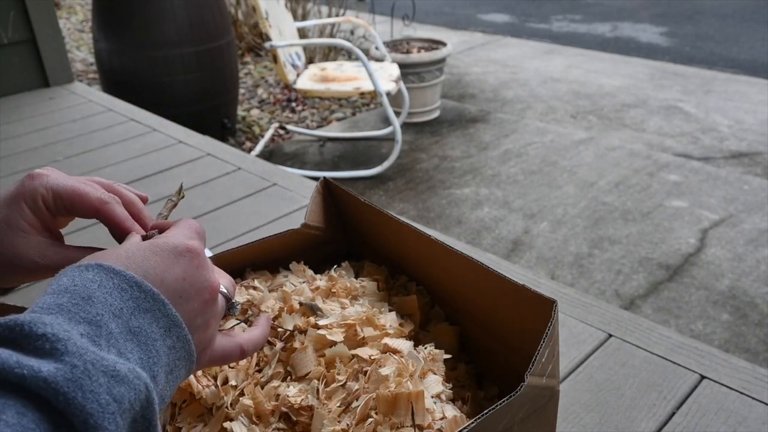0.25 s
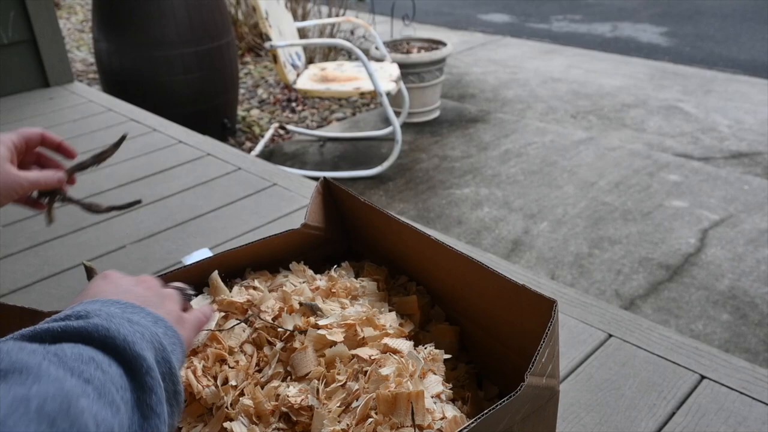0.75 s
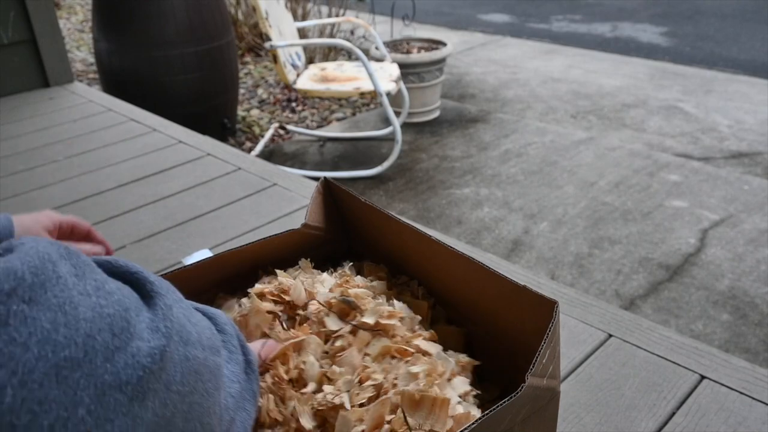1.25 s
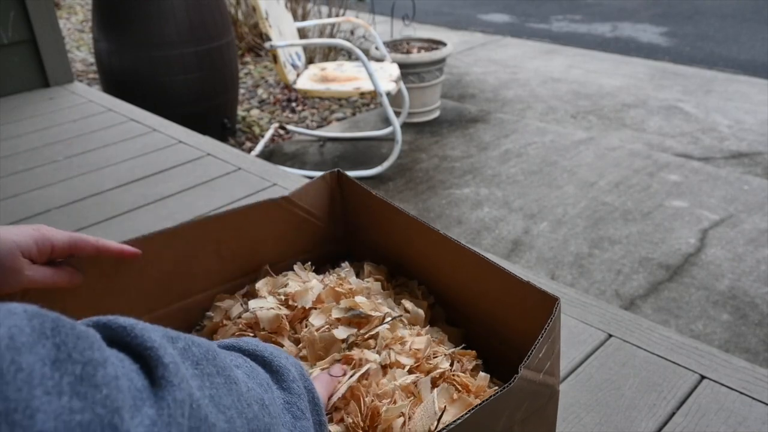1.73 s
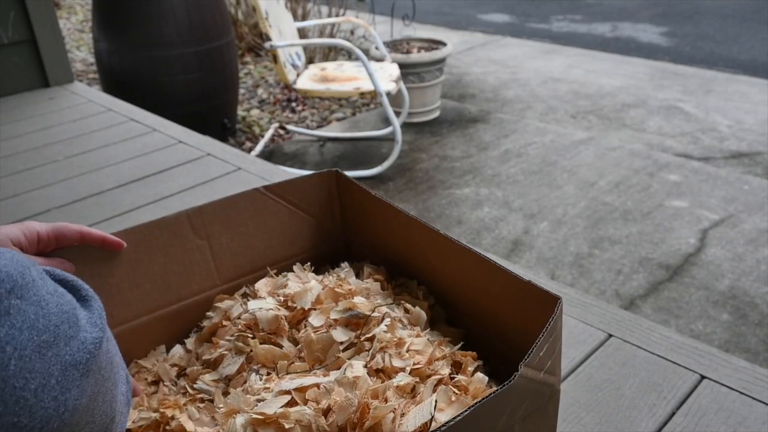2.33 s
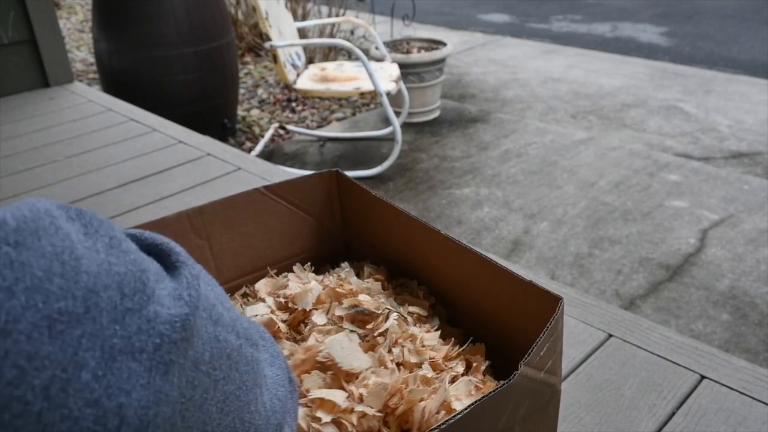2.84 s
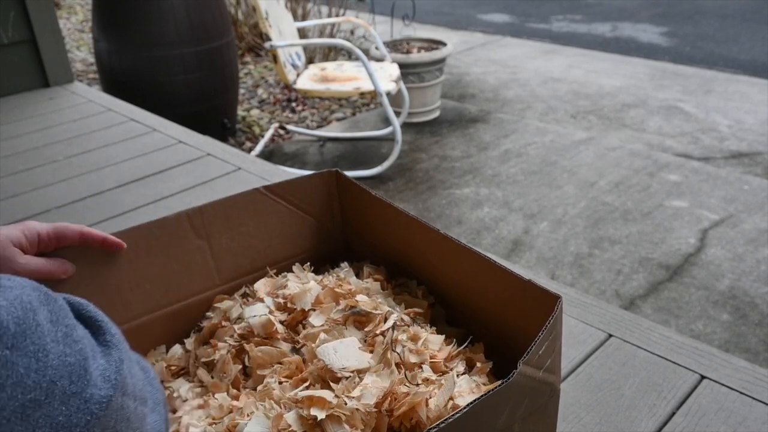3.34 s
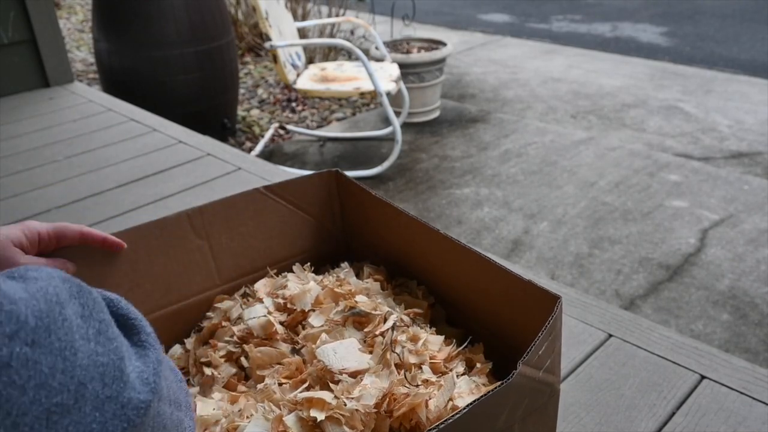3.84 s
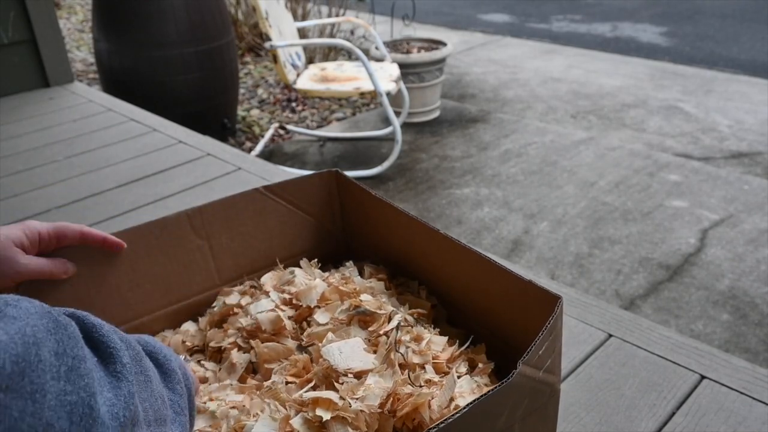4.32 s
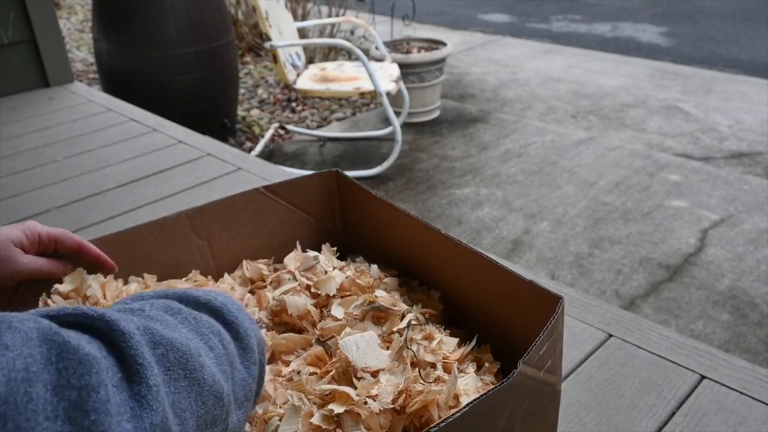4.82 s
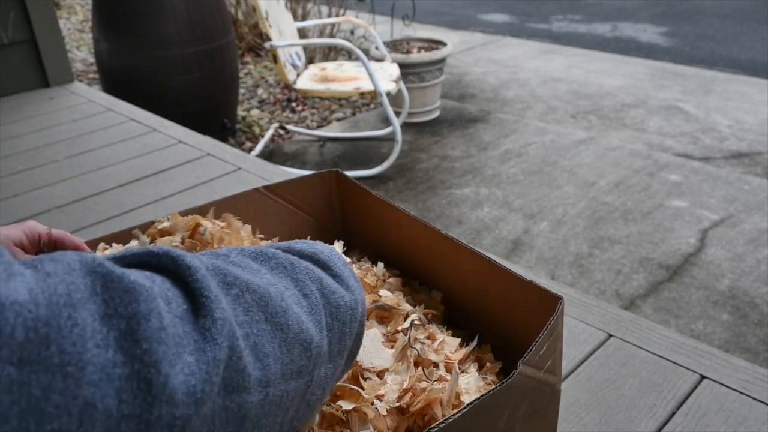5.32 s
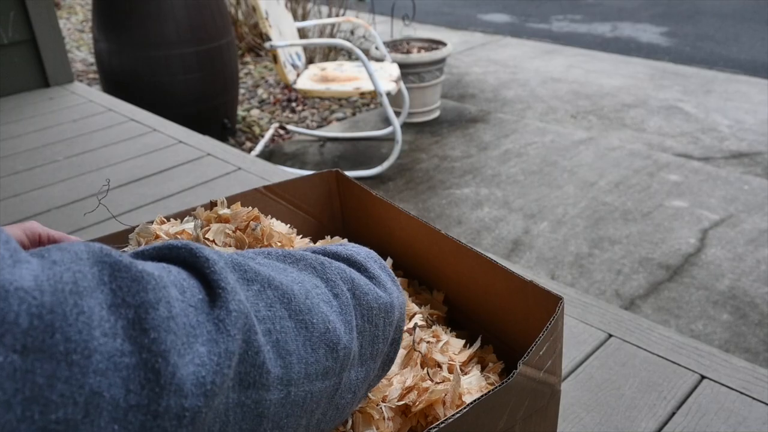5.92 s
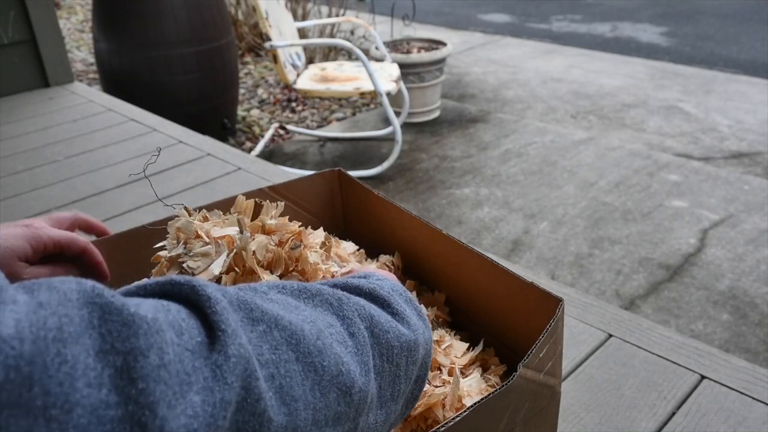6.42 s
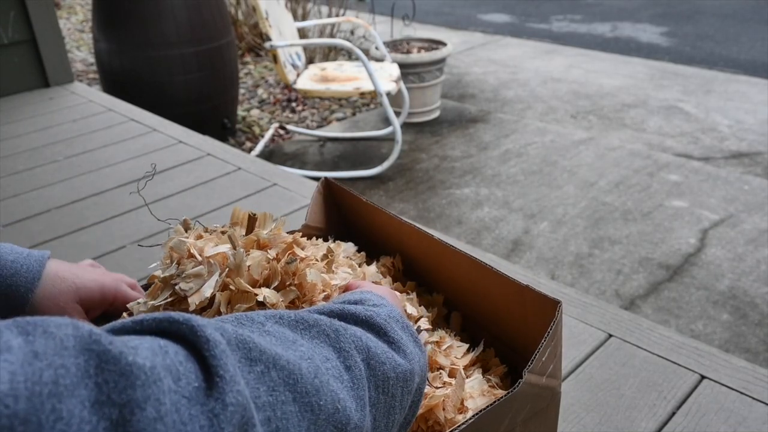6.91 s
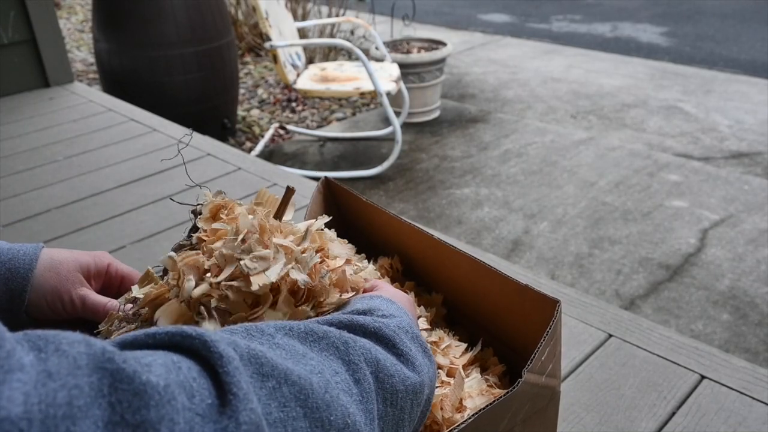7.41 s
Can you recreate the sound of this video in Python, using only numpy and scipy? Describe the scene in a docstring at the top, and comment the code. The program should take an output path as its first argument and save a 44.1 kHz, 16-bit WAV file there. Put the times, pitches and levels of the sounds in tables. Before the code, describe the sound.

Close, dry and centred on a porch, with a soft steady wash of outdoor air. From 0 to 1 s a bird repeats quick falling chirps, about nine a second, with a slight yard echo; dry bark ticks, with a bright snap near the start, and a sleeve hisses faintly around 0.6 s. At 1.2 s hands plunge into wood shavings: a dense crisp rustle and a tumble of hollow cardboard knocks until 1.45 s. Sharp snaps come at 1.55 and 1.9 s, a firm crunch with a knock at 2.2, and a very bright double crack at 2.6. Rustling strokes continue, softer around 3.7-4 s, with strong cracks at 5.0 s. Faint bird whistles come at times. Gentler rummaging follows; at 6.55-7.0 s cardboard scrapes in jerky slips with a small squeak, strongest at the end. Chirps return from 7.1 s over light rustling and ticks.

```python
"""On a quiet porch a bird opens with a run of falling tonal chirps while dry bark ticks and a sleeve hisses.
Hands then stroke through shavings in a cardboard box: dense random slips, filtered as flakes, heap and bottom.
Blows dent the box and ring its wall modes, and splinters snap as short bursts through resonances.
Late on, the panel is scraped by swelling, quickly dying slips; then a shorter run of chirps returns.
Yard and porch echoes are decaying noise tails, and steady coloured noise is the outdoor air."""
import sys
import numpy as np
from scipy import signal
from scipy.fft import rfft, irfft
from scipy.io import wavfile

SR = 44100
rng = np.random.default_rng(int(sys.argv[2]) if len(sys.argv) > 2 else 0)


def materialize(psi):
    """Save the field psi as 16-bit PCM at rate SR to the path in sys.argv[1].

    A 1-D psi becomes a single channel; in a 2-D psi each row is a channel.
    """
    bounded = np.clip(np.atleast_2d(psi).T, -1, 1)
    quanta = np.round(bounded * 32767).astype(np.int16)
    wavfile.write(sys.argv[1], SR, quanta)


N = 337806
TIME, HZ = np.arange(N) / SR, np.fft.rfftfreq(N, 1 / SR)

# relative spectrum of rubbing flakes: f/Hz, density level/dB
FLAKE_SPECTRUM = [(40, -41), (110, -45), (330, -9), (750, -0.5), (2400, 1), (3400, 3.5), (4650, 4.5),
                  (5150, -3.5), (5600, -1), (6400, -11.5), (7200, -8), (7900, -12.5), (9400, -8),
                  (11500, -14)]
# strokes of the hands through the heap: start t/s, rise/s, length/s, level/dB, swell over the stroke/dB,
# depth in the heap/dB, thrum of the box's bottom before its trim/dB
HAND_STROKES = [(0.816, 0.021, 0.043, -54.5, 3, -3, -18), (0.955, 0.094, 0.22, -43.5, 6, -7, -34),
                (1.186, .03, 0.35, -37.5, 0, -4.5, -24), (1.573, 0.16, 0.25, -46, 3.5, -4.5, -21.5),
                (1.85, 0.035, 0.17, -48.5, 0, -7, -26), (2.203, 0.019, 0.078, -35, -2.5, -1, -25),
                (2.283, 0.081, .4, -41.5, 6, -7.5, -35), (2.672, 0.042, 0.28, -41.5, 1.5, -8, -28.5),
                (2.96, 0.087, 0.29, -46, -2, -7.5, -36), (3.282, 0.062, 0.26, -43.5, 1, -5, -24),
                (3.5, 0.071, 0.19, -40, -4.5, -5, -24), (3.687, 0.033, 0.097, -51.5, 2, -8, -22),
                (3.822, 0.063, .19, -49.5, 4, -3.5, -15), (4.12, .13, .28, -44, 0, 1.5, -14),
                (4.403, 0.067, 0.65, -45, 1.5, -2, -20), (5.055, 0.071, 0.26, -45, -2.5, -3.5, -24),
                (5.305, 0.088, 0.24, -47, 0.5, -1, -20.5), (5.59, 0.11, 0.53, -50.5, 0, -4, -23),
                (6.029, 0.11, 0.51, -49, -0.5, -3.5, -24), (6.498, 0.039, 0.54, -53, 0, 3.5, -10),
                (7.078, 0.063, 0.38, -47, 2, -8, -31), (7.433, 0.06, .24, -46.5, 5, -6.5, -19.5)]


def amp(db):
    """Decibels to gain."""
    return 10 ** (np.asarray(db) / 20)


def evened(x):
    """Scales to unit rms."""
    return x / np.sqrt(np.mean(x ** 2) + 1e-20)


def colour(points):
    """Gain at every frequency from a few (Hz, dB) points, joined over log frequency."""
    hz, db = np.transpose(points)
    return amp(np.interp(np.log(HZ + 1), np.log(hz), db))


def resonances(modes, hz):
    """Complex response of a few damped modes (Hz, width Hz, dB)."""
    return sum(
        amp(db) * 1j * hz * width / (f ** 2 - hz ** 2 + 1j * hz * width)
        for f, width, db in modes)


def shaped(x, gain):
    """Filters by a gain at every frequency."""
    return irfft(rfft(x) * gain, len(x))


def add(mix, s, sound):
    """Lays a sound into the mix at time s, in place."""
    start = round(s * SR)
    sound = sound[max(-start, 0):]
    part = mix[max(start, 0):][:len(sound)]
    part += sound[:len(part)]


def wander(cutoff_hz):
    """Slow random drift of unit rms: noise below the cutoff."""
    return evened(shaped(rng.standard_normal(N), 1 / (1 + (HZ / cutoff_hz) ** 4)))


def crackle(per_s, spread_db, ring_s):
    """Random slips with exponentially spread levels, each a tiny dying noise burst."""
    size = amp(spread_db * np.minimum(rng.exponential(1, N), 4))
    slip_energy = size ** 2 * (rng.random(N) < per_s / SR)
    energy = signal.lfilter([1], [1, -np.exp(-2 / (ring_s * SR))], slip_energy)
    return evened(np.sqrt(energy) * rng.standard_normal(N))


def echoes(x, t60):
    """A diffuse tail of unit energy: dying noise after a 3 ms gap."""
    t = np.arange(SR // 2) / SR
    tail = rng.standard_normal(len(t)) * amp(-60 * t / t60) * (t > .003)
    return signal.fftconvolve(x, tail / np.linalg.norm(tail))[:N]


def air(level_db=-55.5):
    """The steady wash of the neighbourhood: coloured noise with a slight slow drift."""
    # relative spectrum of outdoor air: f/Hz, density level/dB
    air_spectrum = [(25, -25), (60, -12), (130, -6.5), (330, -8.5), (800, 0.5), (1650, -1), (1950, -6),
                    (3000, -2), (4500, 1.5), (5500, -8), (7500, -18), (11500, -18.5)]
    wash = evened(shaped(rng.standard_normal(N), colour(air_spectrum)))
    return amp(level_db + .5 * wander(0.53)) * wash


def sleeve(trim_db=-3.5):
    """Cloth sliding gives a narrow high hiss, which holds its last level to the end."""
    # soft slide of the sleeve: t/s, level before the trim/dB
    slide = [(.3, -86), (.5, -61), (.66, -55.5), (.78, -59), (.86, -64)]
    at, level_db = np.transpose(slide)
    hiss = evened(shaped(rng.standard_normal(N), resonances([(5960, 1100, 0)], HZ) ** 2))
    return amp(np.interp(TIME, at, level_db) + trim_db) * hiss


def birds(wet_db=-3, near_db=-1, whistle_wet_db=-6, vary_db=.5):
    """Falling chirps and a few thin whistles, gliding sines with the yard's echo behind them."""
    # one chirp: t from its start/s, f/Hz, relative level/dB
    slur = [(-.014, 4770, -14), (-.007, 4390, -10), (-.002, 4160, -15), (.002, 3600, 0.5),
            (.006, 3250, -11), (.01, 3020, 2), (.016, 2720, -9.5), (.024, 2100, -11)]
    # runs of chirps: start t/s, end t/s, spacing/s, level before the direct and echo gains/dB
    chirp_runs = [(.019, .96, .1112, -42), (7.113, 7.63, .1155, -41.5)]
    # faint thin whistles: t/s, length/s, start f/Hz, end f/Hz, direct level/dB
    thin_whistles = [(1.944, 0.048, 3500, 2850, -44.5), (5.042, 0.12, 8100, 7500, -59),
                     (5.76, 0.17, 8270, 7600, -56), (5.886, 0.059, 1720, 1673, -53),
                     (6.318, 0.071, 1960, 1965, -51), (6.607, 0.087, 1720, 1674, -49)]
    chirps, whistles = np.zeros((2, N))
    at, pitch, loud = np.transpose(slur)
    t = np.arange(at[0], at[-1], 1 / SR)
    for start, end, period, run_db in chirp_runs:
        for s in np.arange(start, end, period):
            hz = np.interp(t, at, pitch) * (1 + 0.0061 * rng.standard_normal())
            level_db = run_db + vary_db * rng.standard_normal() + np.interp(t, at, loud)
            tone = np.sin(2 * np.pi * np.cumsum(hz) / SR)
            add(chirps, s + at[0], amp(level_db) * tone * signal.windows.tukey(len(t), .1))
    for s, length, start_hz, end_hz, db in thin_whistles:
        u = np.linspace(0, 1, int(length * SR))
        hz = end_hz + (start_hz - end_hz) * (1 - u) ** 2
        tone = np.sin(2 * np.pi * np.cumsum(hz) / SR)
        add(whistles, s, amp(db) * signal.windows.tukey(len(u), .5) * tone)
    yard = echoes(amp(wet_db) * chirps + amp(whistle_wet_db) * whistles, t60=0.41)
    return amp(near_db) * chirps + whistles + yard


def drag(crush_db=-8, crush_hz=3800, crush_width_hz=2400):
    """Uneven sticking and slipping drives the panel, crushes flakes and excites a narrow noisy squeak."""
    # modes of the dragged panel: f/Hz, width/Hz, level/dB
    panel_modes = [(60, 44, -27), (219, 69, 8.5), (640, 180, 12), (1190, 710, -1), (1690, 190, 8),
                   (2200, 170, 10.5), (2780, 120, 1), (3400, 150, -15), (4600, 200, -28)]
    # the arm sticks and slips on the cardboard: t of letting go/s, build-up/s, scrape level/dB,
    # crushed flakes level before the crush trim/dB, squeak level/dB
    arm_slips = [(6.572, 0.026, -39, -42, -59), (6.703, 0.023, -41.5, -53, -60),
                 (6.825, 0.034, -38.5, -46, -41), (6.885, .03, -40, -51, -56),
                 (6.972, 0.097, -42, -43, -37), (7.009, 0.056, -33, -29.5, -48)]
    build_db, let_go_db_per_s = 27.5, 800  # swell over the build-up, then a quick decay
    slips = crackle(per_s=1100, spread_db=-2.0, ring_s=0.00083)
    # the panel radiates weakly below 140 Hz
    scrape = evened(shaped(slips, resonances(panel_modes, HZ) * HZ / np.hypot(HZ, 140)))
    crushed = crackle(per_s=1600, spread_db=1.5, ring_s=0.00052)
    crush_gain = resonances([(crush_hz, crush_width_hz, 0)], HZ) * colour(FLAKE_SPECTRUM)
    crush = evened(shaped(crushed, crush_gain))
    squeak = evened(shaped(rng.standard_normal(N), resonances([(1600, 250, 0)], HZ) ** 2))
    out = np.zeros(N)
    for s, build_s, db, flakes_db, squeak_db in arm_slips:
        build = -build_db * (np.clip(s - TIME, 0, 1) / build_s) ** 2
        force = amp(build - let_go_db_per_s * np.clip(TIME - s, 0, 1))
        out += force * (amp(db) * scrape + amp(flakes_db + crush_db) * crush + amp(squeak_db) * squeak)
    return out


def blow(peak_db, dent_hz, ring_db, crease_db=-17, dent_cycles=7.9):
    """The cardboard dents with a short dull pulse and a crunch of its creases; the walls ring on."""
    # modes of the cardboard walls: f/Hz, relative level/dB, t60/s
    wall_modes = [(125, -16, .14), (332.3, 0.5, .42), (403, -3, 0.23), (478, -10, 0.29), (546.4, -2.5, 0.3),
                  (627, -17, 0.59), (840, -5.5, .2), (914, -5.5, 0.42), (1060, -1, 0.17), (1360, -13, 0.21),
                  (1674, 7, 0.058), (1970, 4, .016)]
    t = np.arange(SR // 2) / SR
    # the dent falls 60 dB in dent_cycles swings
    decay = amp(-60 * t * dent_hz / dent_cycles)
    dent = np.sin(2 * np.pi * dent_hz * t) * decay * (1 - np.exp(-t / 0.001))
    # air slips round the panel, so it radiates little well below its own pitch
    radiate = signal.butter(2, dent_hz / 2, "high", fs=SR, output="sos")
    dent = signal.sosfilt(radiate, dent)
    # modes near the dent's pitch ring most
    walls = sum(
        amp(db - 60 * t / t60) * np.sin(2 * np.pi * hz * t) / (1 + np.log2(hz / dent_hz) ** 2)
        for hz, db, t60 in wall_modes)
    crease_band = signal.butter(2, [dent_hz, 2.1 * dent_hz], "band", fs=SR, output="sos")
    crease = signal.sosfilt(crease_band, rng.standard_normal(len(t)))
    crease = amp(crease_db - 60 * t / 0.15) * evened(crease)
    ringing = amp(ring_db) * signal.sosfilt(radiate, walls)
    return amp(peak_db) * (dent / abs(dent).max() + crease + ringing)


def snap(peak_db, bright_hz, length, octaves, crest_db=7):
    """Fibres tear in a burst of about a millisecond and ring the splinter around its brightest pitch."""
    # modes of a splinter: f/Hz, width/Hz, level/dB
    splinter_modes = [(1340, 680, 8.5), (1700, 220, 2), (2900, 1600, 13.5), (3470, 260, 12),
                      (4300, 670, 13), (5440, 91, 13), (7250, 1100, 3.5), (9100, 450, 3)]
    t, hz = np.arange(2048) / SR, np.fft.rfftfreq(2048, 1 / SR)
    tear = rng.choice([-1, 1], len(t)) * np.tanh(t / (0.24 * length)) / (1 + (t / length) ** 3)
    brightness = np.exp(-.5 * (np.log2((hz + 1) / bright_hz) / octaves) ** 2)
    crack = shaped(tear, resonances(splinter_modes, hz) * brightness)[:len(t) // 2]
    crack = signal.sosfilt(signal.butter(2, bright_hz / 5, "high", fs=SR, output="sos"), crack)
    # level is set by energy; the crest allowance makes peak_db approximate
    return amp(peak_db - crest_db) * crack / np.linalg.norm(crack) * np.sqrt(length * SR)


def twig(per_s=28, peak_db=-55, spread_db=5.5, bright_hz=10000, length=0.0014):
    """Dry bark ticks between the fingers, at random times until the second stroke starts."""
    out = np.zeros(N)
    chance, size = rng.random(N), rng.standard_normal(N)
    for k in np.flatnonzero((chance < per_s / SR) & (TIME < HAND_STROKES[1][0])):
        add(out, TIME[k], snap(peak_db + spread_db * size[k], bright_hz, length, octaves=0.79))
    return out


def hands(settle_db_per_s=86):
    """Effort, depth and thrum in dB: strokes rise, swell or sag and settle; overlaps add in power."""
    power, pressed, bottom = np.zeros((3, N)) + 1e-14
    for start, rise, length, db, swell_db, depth_db, thrum_db in HAND_STROKES:
        t = TIME - start
        settling = settle_db_per_s * np.maximum(t - length, 0)  # the flakes come to rest
        level_db = db + swell_db * np.clip(t / length, 0, 1) - settling
        stroke = (np.clip(t / rise, 0, 1) * amp(level_db)) ** 2
        power += stroke
        pressed += stroke * depth_db
        bottom += stroke * thrum_db
    return 10 * np.log10(power), pressed / power, bottom / power


def flake_cracks(per_s=45, over_db=6, spread_db=0.7, length=0.00087, follow=0.91, usual_db=-44):
    """Single curled flakes give way, each at its own pitch, standing out more in gentle strokes."""
    out, effort_db = np.zeros(N), hands()[0]
    chance, size, pitch = rng.random((3, N))
    for k in np.flatnonzero((chance < per_s / SR) & (TIME > HAND_STROKES[0][0])):
        rustle_db = usual_db + follow * (effort_db[k] - usual_db)
        db = rustle_db + over_db - spread_db * np.log(max(size[k], .04))
        add(out, TIME[k], snap(db, 1300 * 7 ** pitch[k], length, octaves=0.34))
    return out


def shavings(per_s=12000, clump_db=0.77, flutter_db=1.25, level_db=-1.0, crisp_db=-3.0, thrum_db=-2):
    """Flakes slip in clumps, more with effort; pressing deep brings out the heap and the box's bottom."""
    # hollow of the box around the heap: f/Hz, width/Hz, level/dB
    hollow_modes = [(886, 67, -56), (1390, 73, -8.5), (1635, 90, -1)]
    # modes of the box's bottom: f/Hz, width/Hz, level/dB
    bottom_modes = [(128, 31, -0.5), (210, 64, 11), (256.9, 30, 15)]
    effort_db, depth_db, bottom_db = hands()
    busy = np.sqrt(amp(effort_db - effort_db.max()))
    # dividing by sqrt(busy) keeps the level even as the slip rate changes
    slips = crackle(per_s * busy, spread_db=0.0, ring_s=0.00093) / np.sqrt(busy)
    slips = evened(slips * (TIME > HAND_STROKES[0][0]) * amp(clump_db * wander(48.3)))
    flakes = shaped(slips, colour(FLAKE_SPECTRUM) * (1 + resonances(hollow_modes, HZ)))
    # three bands, parted near 2200 and 6200 Hz
    low = 1 / (1 + (HZ / 2200) ** 6)
    high = 1 - 1 / (1 + (HZ / 6200) ** 12)
    heap = amp(depth_db + flutter_db * wander(13.5)) * evened(shaped(flakes, low))
    rub = amp(level_db) * evened(shaped(flakes, 1 - low - high))
    edges = amp(crisp_db) * evened(shaped(flakes, high))
    radiated = HZ / np.hypot(HZ, 130) / (1 + (HZ / 450) ** 4)
    thrum = evened(shaped(slips, resonances(bottom_modes, HZ) * radiated))
    bottom = amp(bottom_db + thrum_db) * thrum
    return amp(effort_db) * (heap + rub + edges + bottom)


def scene(porch_db=-12):
    """Knocks, snaps and scrapes echo briefly off the porch, over the rustle and the yard."""
    # blows on the box: t/s, dent peak level/dB, dent f/Hz, wall ringing relative to the dent/dB
    box_blows = [(1.197, -34, 423, -18), (1.2216, -14, 1000, -14), (1.2231, -14, 610, -16.5),
                 (1.235, -27, 980, -24), (1.2662, -15, 570, -16.5), (1.2755, -31, 347, -16),
                 (1.3035, -28.5, 800, -22), (1.325, -23.5, 555, -26), (1.335, -25.5, 885, -19),
                 (1.3438, -21, 1390, -18), (1.411, -23.5, 597, -21), (1.4174, -22.5, 1240, -22),
                 (1.434, -23.5, 1470, -16), (1.613, -45, 119, -23), (1.622, -40.5, 533, -13),
                 (2.2048, -30, 643, -6), (2.224, -35, 456, -13), (2.23, -44, 143, -24),
                 (2.29, -29, 900, -12), (3.606, -36.5, 490, -21), (5.024, -34, 900, -22),
                 (5.23, -41.5, 600, -22), (6.133, -51, 263, -30), (6.553, -49, 223, -24),
                 (6.668, -41, 250, -36), (6.834, -39.5, 270, -30), (7.121, -49.5, 383, -35),
                 (7.571, -49, 300, -30)]
    # splinters and twigs snapping, except the 1.941 s row, a short bright burst at the onset of the bird's thin
    # call: t/s, approximate peak level/dB, brightest f/Hz, length/s, spread/octaves
    wood_snaps = [(.0497, -29, 10000, 0.00066, 0.27), (.079, -45, 11000, .003, .8),
                  (0.485, -47, 6870, .0038, 0.98), (0.8555, -32.5, 1810, 0.0029, 0.7),
                  (1.547, -16, 2400, 0.0017, 0.61), (1.8825, -25.5, 2800, 0.0019, 0.99),
                  (1.941, -32, 3900, 0.0039, 0.64), (2.203, -22.5, 1700, 0.00082, 0.94),
                  (2.221, -25, 2200, 0.00086, .9), (2.623, -11, 8000, 0.0012, 1.2),
                  (2.635, -14.5, 8000, 0.00062, .7), (4.9265, -22, 4400, 0.0019, 0.79),
                  (5.004, -10.5, 6300, 0.00068, .6), (5.016, -18, 7000, 0.00039, 0.4),
                  (5.34, -27.5, 3600, 0.0017, 0.74), (5.467, -31, 1700, 0.0051, .9),
                  (6.133, -31, 1400, .0036, 1.3), (6.4074, -21.5, 1500, 0.0039, 1.4),
                  (6.615, -32.5, 1620, .0023, 0.63), (6.7354, -24.5, 1850, 0.0027, .8),
                  (7.177, -29, 4820, .004, 1.4), (7.186, -24, 3900, 0.0019, 1.3)]
    hits = np.zeros(N)
    for s, *row in box_blows:
        add(hits, s, blow(*row))
    for s, *row in wood_snaps:
        add(hits, s, snap(*row))
    hits += drag() + flake_cracks() + twig()
    porch = amp(porch_db) * echoes(hits, t60=0.12)
    mix = hits + porch + shavings() + birds() + sleeve() + air()
    return np.array([mix, mix])


def record(dry, edge_hz=11850):
    """One microphone on both channels, with a steep low-pass limit."""
    band_limit = signal.firwin(301, edge_hz, window=("kaiser", 8), fs=SR)
    return signal.oaconvolve(dry, band_limit[None], "same")


dry = scene()
out = record(dry)
materialize(out)
```